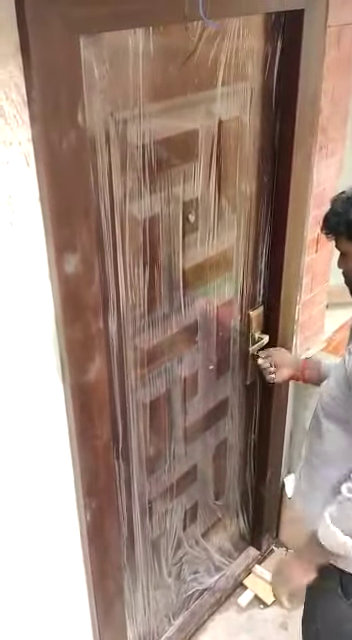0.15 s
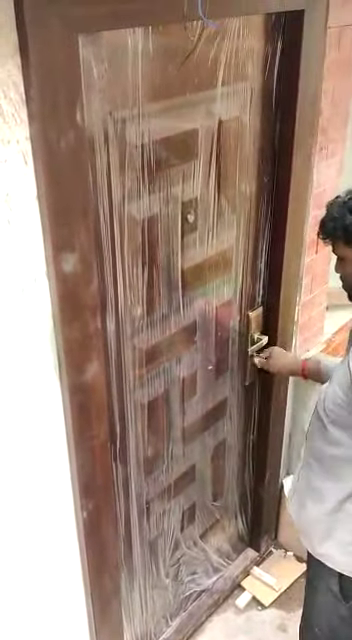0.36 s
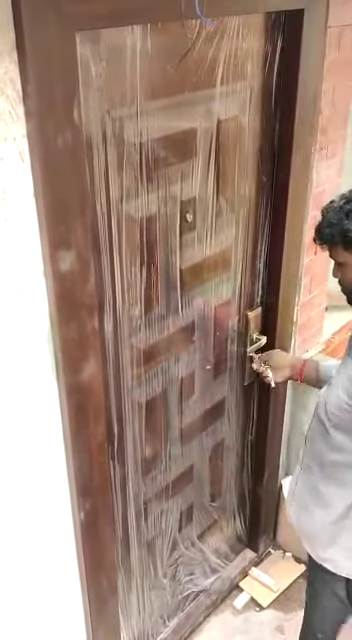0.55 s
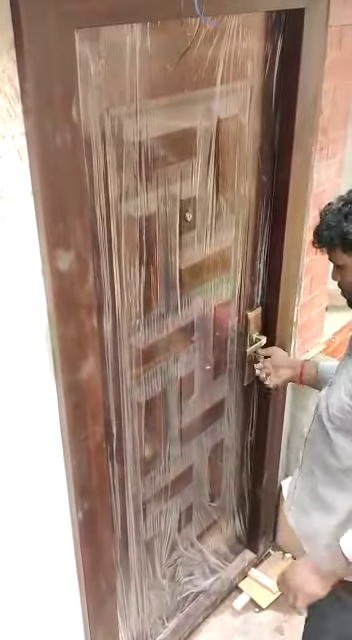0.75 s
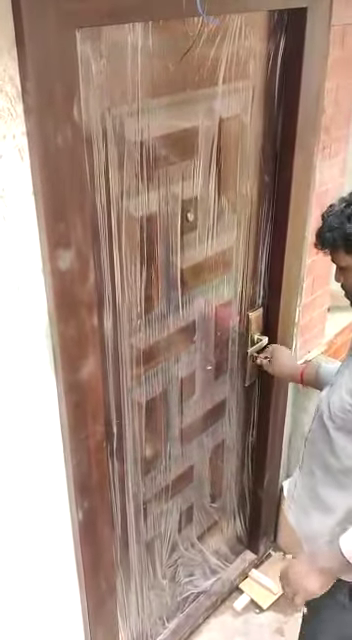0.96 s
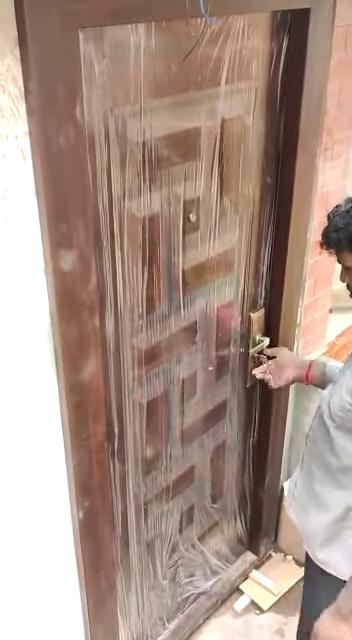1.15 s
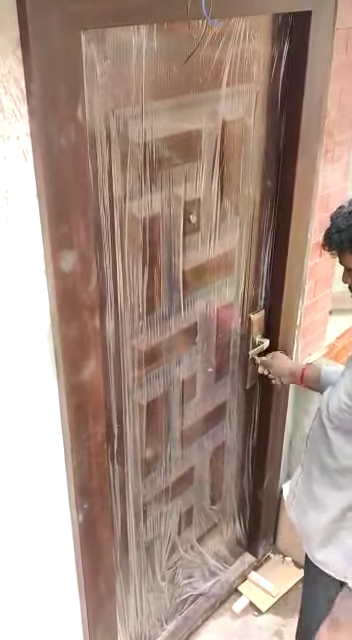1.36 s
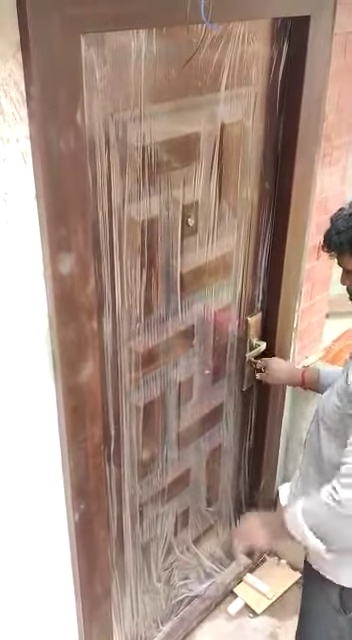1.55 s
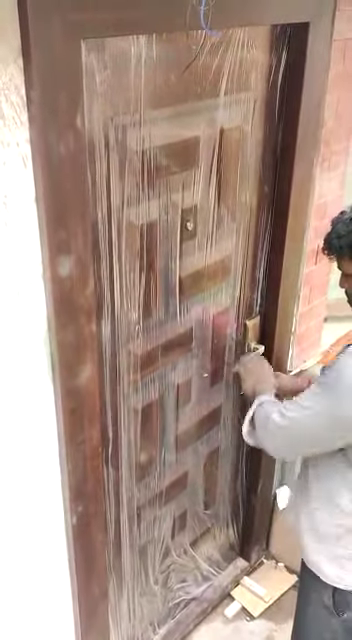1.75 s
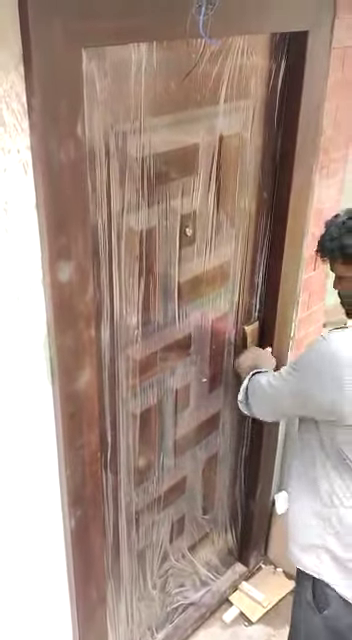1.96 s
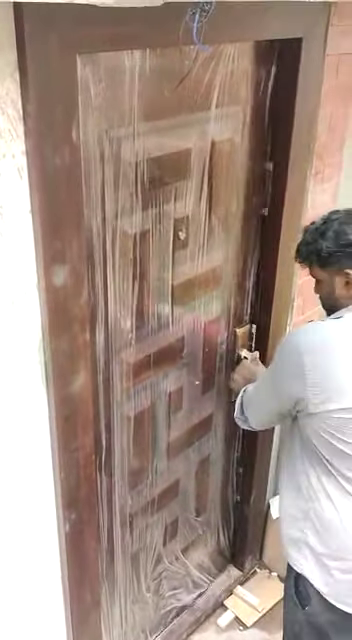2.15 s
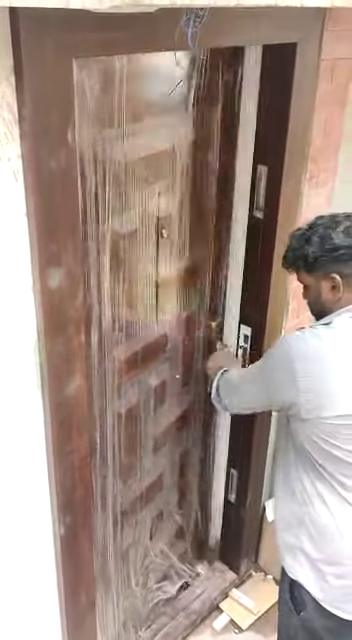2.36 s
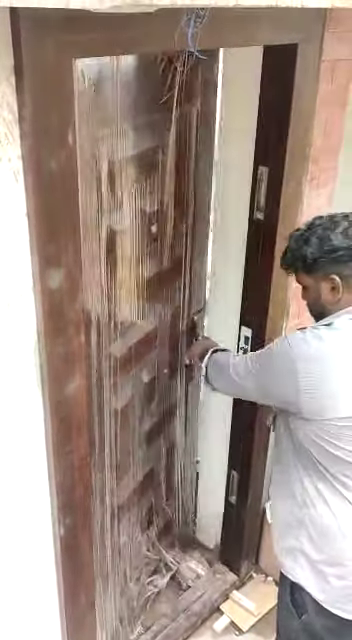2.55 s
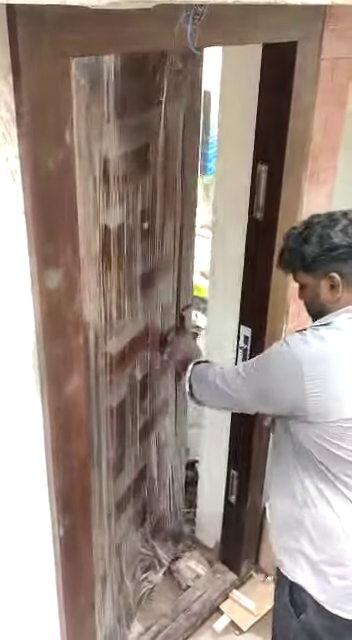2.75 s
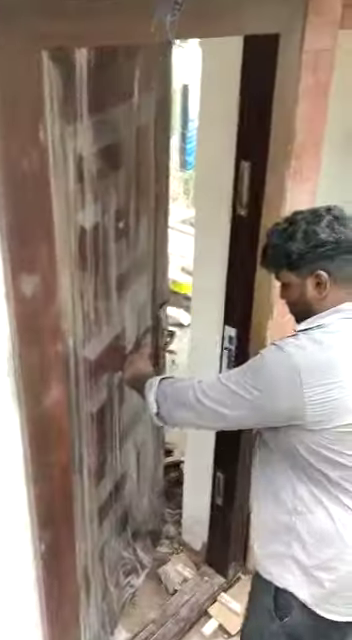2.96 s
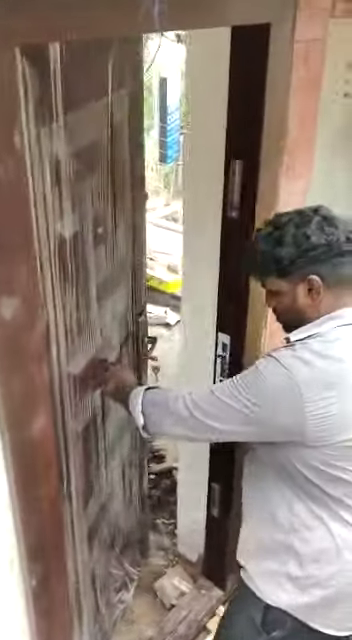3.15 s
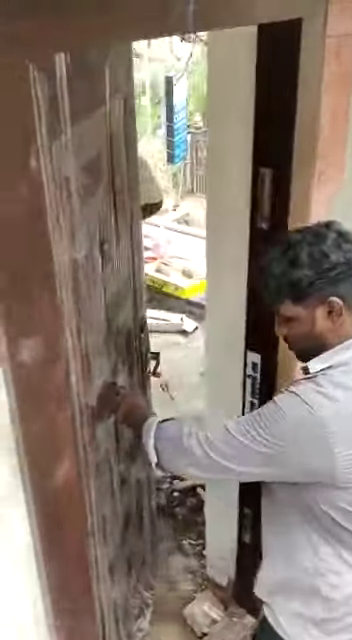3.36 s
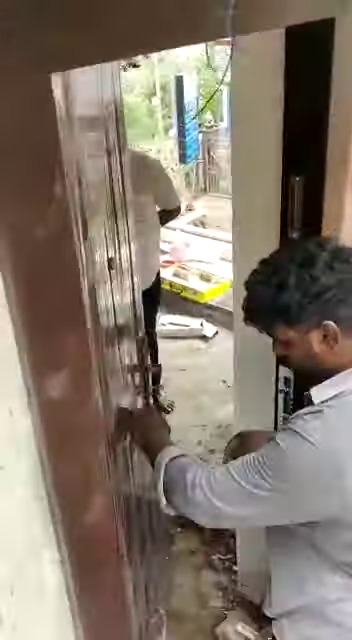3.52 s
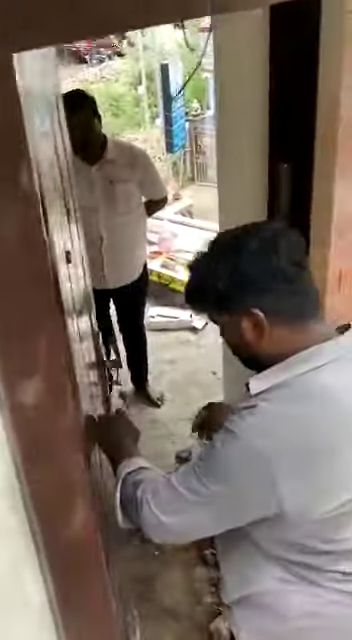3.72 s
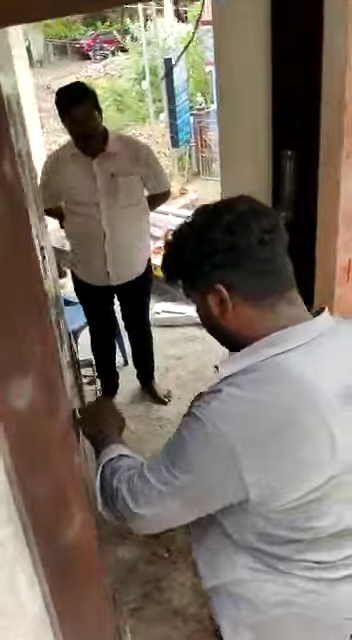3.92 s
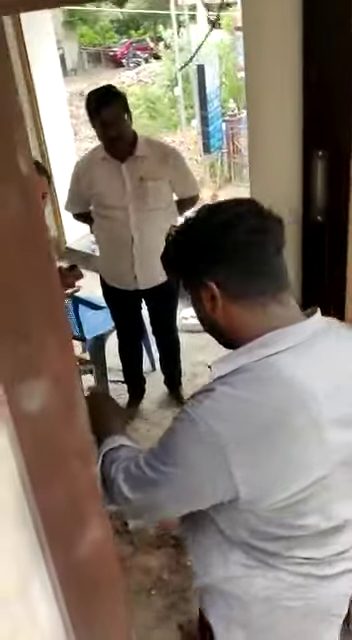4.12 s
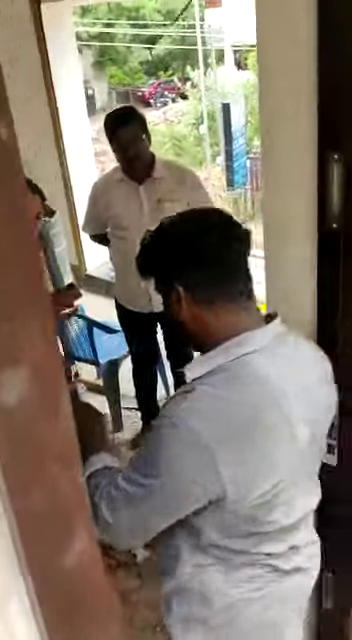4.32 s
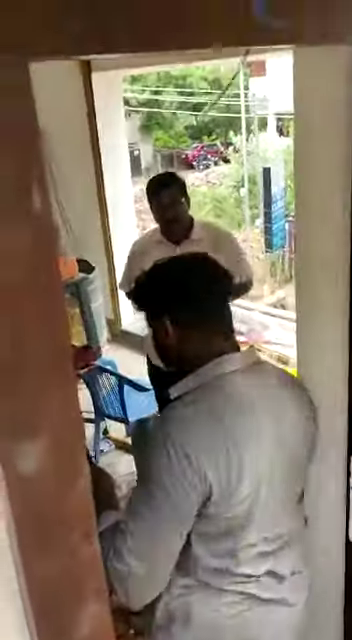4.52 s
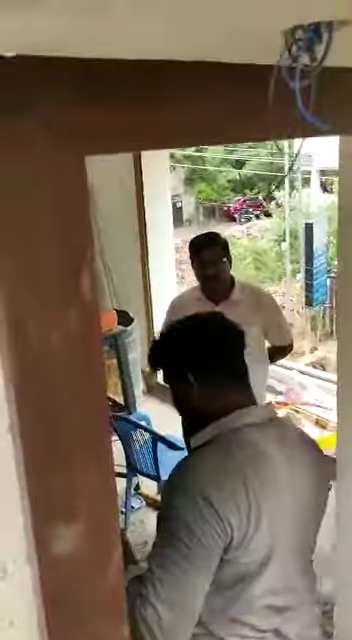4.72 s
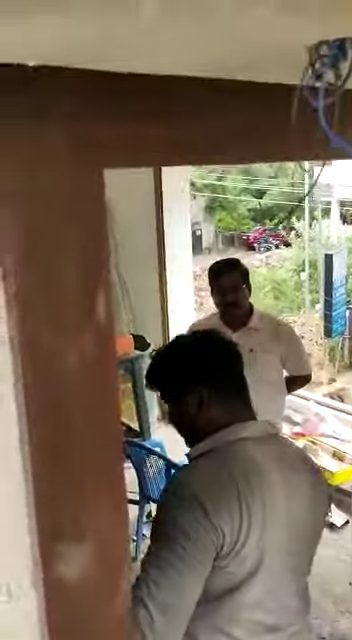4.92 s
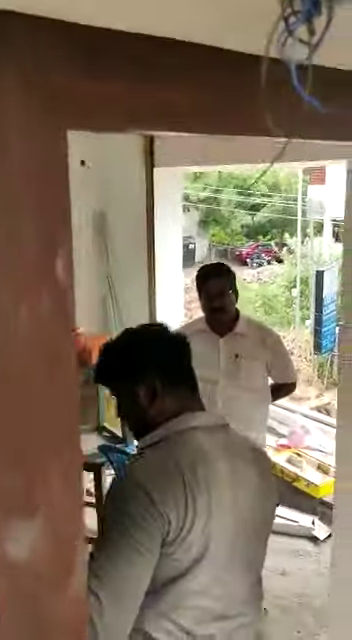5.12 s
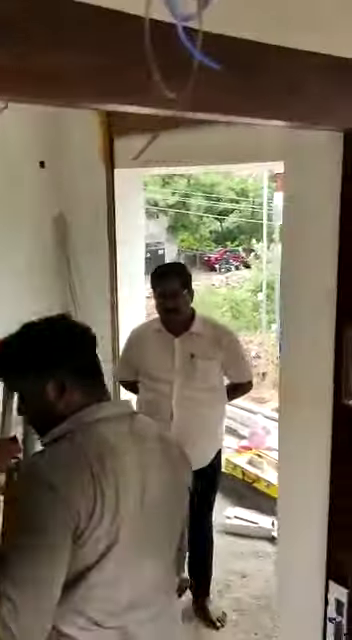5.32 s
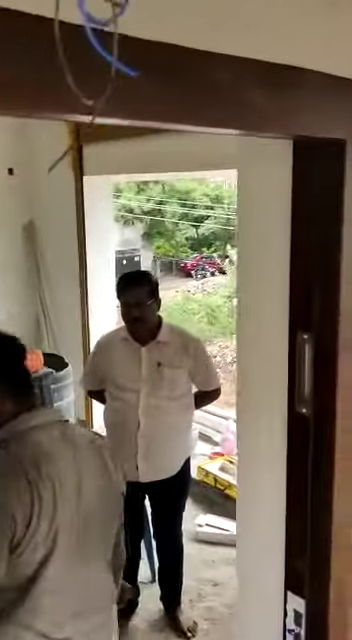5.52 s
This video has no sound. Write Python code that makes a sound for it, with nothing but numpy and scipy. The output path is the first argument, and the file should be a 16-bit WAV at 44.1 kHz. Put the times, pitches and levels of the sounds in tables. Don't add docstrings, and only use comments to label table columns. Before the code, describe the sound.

Handheld stereo pickup at a doorway on a building site: quiet rumble and hiss, small metallic ticks, two strong lock throws about a second apart, then a bright latch rattle as the door comes free. The rest is loud abrasive cutting, surging several times a second or so, with singing blade tones, rumbling work and a motor hum swelling at the end.

```python
import sys
import numpy as np
from scipy import signal
from scipy.fft import rfft, irfft, next_fast_len
from scipy.io import wavfile

SR = 44100
rng = np.random.default_rng(int(sys.argv[2]) if len(sys.argv) > 2 else 0)


def wav_out(sig):
    wavfile.write(sys.argv[1], SR, np.round(np.clip(np.atleast_2d(sig).T, -1, 1) * 32767).astype(np.int16))


def boost_factor(decibels):
    exponent = np.asarray(decibels, float) / 20
    return 10 ** exponent


N = 246078

# (time [s], peak level [dB], door body level [dB], T60 [s])
CONTACTS = [(0.065, -63, -58, 0.16), (0.124, -50, -39, 0.15), (0.153, -41, -36, 0.11),
            (0.2145, -32.5, -27.5, 0.17), (0.237, -30, -37, 0.12), (0.259, -19.5, -23, 0.16),
            (0.2893, -16, -44, 0.11), (0.6305, -33, -28, 0.13), (0.6415, -31, -28, 0.13),
            (0.6691, -48, -31.5, 0.12), (0.8779, -40, -34.5, 0.086), (0.913, -32, -46, 0.16),
            (0.9396, -39.5, -29.5, 0.25), (0.9791, -44, -29.5, 0.11), (1.034, -46, -38, 0.14),
            (1.079, -39.5, -48, 0.2), (1.272, -31.5, -31, 0.086), (1.3364, -37, -32, 0.22),
            (1.3812, -24.5, -22.5, 0.16), (1.4057, -16, -16.5, 0.14), (1.4347, -9, -26, 0.11),
            (1.7025, -46, -38, 0.08), (1.736, -43, -43, 0.4), (1.8399, -44, -35, 0.28),
            (1.9655, -42, -29, 0.092), (2.0707, -35.5, -27, 0.31), (2.1072, -13.5, -31, 0.14),
            (2.1386, -16, -33, 0.1), (2.176, -15.5, -45, 0.07), (2.2872, -12.5, -33, 0.067)]
# (time at full speed [s], run-up [s], hold [s], scrape level [dB], body level [dB])
SLIDES = [
    (0.295, 0.025, 0.033, -24, -18.5),
    (1.441, 0.044, 0.025, -25, -21.5),
    (2.115, 0.0044, 0.014, -33, -33),
    (2.17, .004, .004, -35, -30),
    (2.284, 0.045, .002, -34.5, -32.5),
]
# (time [s], peak level [dB], frequency [Hz], T60 [s])
PINGS = [
    (0.0643, -45, 4340, 0.073),
    (0.154, -43, 4430, 0.074),
    (0.6205, -42, 4480, 0.08),
    (0.639, -43, 4600, 0.06),
    (0.799, -51, 4380, 0.074),
    (1.0799, -45, 5980, 0.08),
    (1.272, -44, 4370, 0.08),
    (2.107, -34, 2490, 0.12),
]
# (frequency [Hz], width [Hz], level [dB])
LOCK_MODES = [(1140, 33, 19), (1430, 7, 13.5), (1820, 41, 10), (2490, 190, -5), (2900, 36, -34.5),
              (3280, 73, -10.5), (3840, 77, -42), (4740, 68, 20), (5720, 240, -2), (6700, 44, 7),
              (8300, 220, -28), (8770, 34, -78)]
# (frequency [Hz], density [dB per Hz])
LOCK_SPECTRUM = [(700, -6.5), (1300, -1.5), (3200, -4.5), (4800, -6), (6800, -9.5), (8500, -23),
                 (11000, -9), (14500, -20.5), (18000, -18)]
# (frequency [Hz], width [Hz], level [dB])
DOOR_MODES = [(198, 87, -7.5), (311, 230, -1.5), (343.6, 19, -3), (406, 87, 4), (450, 51, -9),
              (565.4, 25, -2), (764, 84, -18)]
LATCH_FROM_S, LATCH_CUT_HZ = 2.06, 2200
SCRAPE_FALL_DB_PER_S, BOOM_FALL_DB_PER_S = 456, 184
SETTLE_DB, SETTLE_DB_PER_S = -20.5, 95

# (time [s], hold [s], level [dB])
SHUDDERS = [
    (.30, .03, -30.5),
    (1.446, .03, -33),
    (1.987, .015, -33),
    (2.103, .11, -23.5),
    (2.66, .01, -38),
]
SHUDDER_HZ, SHUDDER_RISE_S, SHUDDER_FALL_DB_PER_S = 30.5, 0.03, 65

# (time at full pressure [s], hold [s], grit level [dB], work rumble level [dB])
PUSHES = [(2.393, 0.16, -26, -23), (2.85, 0.08, -22, -23), (3.177, .02, -22, -23.5),
          (3.402, 0.072, -23, -21), (3.748, 0.047, -21.5, -20), (4.007, 0.027, -22, -19),
          (4.244, .02, -22.5, -20), (4.425, 0.11, -23, -19.5), (4.687, 0.1, -26, -24.5),
          (4.907, 0.037, -25, -20.5), (5.09, 0.16, -24.5, -25.5), (5.343, 0.33, -23, -31)]
PUSH_RISE_S, GRIT_FALL_DB_PER_S, RUMBLE_FALL_DB_PER_S = 0.19, 65, 61
CUT_FROM_S, IDLE_GRIT_DB, IDLE_RUMBLE_DB = 2.29, -30.5, -38
# (time [s], hold [s], low song level [dB], high song level [dB])
SONGS = [(2.377, 0.22, -29, -29), (2.524, 0.13, -32, -30), (2.845, 0.2, -31.5, -30),
         (3.18, 0.023, -21, -23.5), (3.274, 0.1, -25, -30.5), (3.39, .03, -29, -35),
         (3.464, 0.11, -43, -30), (3.767, 0.13, -33, -28), (4.053, 0.033, -23.5, -28),
         (4.258, 0.13, -32, -29), (4.44, 0.24, -27.5, -27.5), (4.74, 0.29, -29, -30),
         (5.1, 0.15, -35, -36.5), (5.42, .12, -48, -34)]
SONG_RISE_S, SONG_FALL_DB_PER_S = 0.079, 132
# (frequency [Hz], density [dB per Hz])
GRIT_SPECTRUM = [(600, -5), (850, -25), (1100, -27), (1400, -8), (2300, -3.5), (3050, -8), (4300, -0.5),
                 (5600, -7.5), (7200, -10), (9900, -15), (12000, -16), (14000, -12), (18000, -40)]
# (frequency [Hz], density [dB per Hz])
RUMBLE_SPECTRUM = [(53, -40), (90, -9.5), (226, -2.5), (284, 1.5), (330, -1.5), (419, -4), (504, -3),
                   (587, -0.5), (668, -2.5), (1200, -5.5), (1560, -60), (2640, -120)]
# (frequency [Hz], width [Hz], level [dB])
WORK_MODES = [(337, 30, 0), (427, 29, 2.5), (583, 30, -4.5), (723, 29, -10.5)]
WORK_DB = -3
# (frequency [Hz], width [Hz], level [dB])
LOW_SONG_MODES = [(4228, 90, 0), (4350, 600, -5)]
# (frequency [Hz], width [Hz], level [dB])
HIGH_SONG_MODES = [(11615, 150, 0), (12310, 60, -4), (12200, 1500, -3), (7410, 150, -5), (6930, 140, -7)]
# (frequency [Hz], width [Hz], level [dB])
SQUEAL_MODES = [(4800, 250, 0)]
SQUEAL_S, SQUEAL_HOLD_S, SQUEAL_DB = 4.7, 0.1, -28
TOOL_LAG = 10

# (time [s], shaft frequency [Hz], nearness as level of its tones [dB])
MOTOR = [
    (2.3, 53.94, -46),
    (3.2, 53.96, -38),
    (4.2, 54.13, -36),
    (4.651, 53.7, -37.5),
    (4.9, 53.37, -31.5),
    (5.3, 53.34, -27),
    (5.58, 53.6, -25.5),
]
ORDERS = [2, 3, 4, 6, 7, 8, 9, 10, 11, 12, 14, 17, 20, 21, 22, 26, 37]
ORDERS_DB = [-30, -1.5, -6, -0.5, -4.5, -5.5, -9.5, -6, 3, -7, -10, -18, -2, -10, -13, -15, -9]
# (frequency [Hz], density [dB per Hz])
FAN_SPECTRUM = [(750, -2.5), (1070, -7), (1300, -5), (1900, -7.5), (2300, -11.5), (2800, -25)]
LOWEST_DB, FAN_DB, FAN_FOLLOWS = -40, -25.5, 1
FAN_FLICKER_DB = 1.5
# (time [s], hold [s], level [dB])
BOOMS = [
    (4.502, .1, -44),
    (5.365, .3, -24.5),
]
BOOM_RISE_S, BOOM_END_DB_PER_S = 0.1, 82

ROOM_T60_S, WALL_CUT_HZ = 0.42, 9300

# (frequency [Hz], density [dB per Hz])
TRAFFIC_SPECTRUM = [(12, -30), (20, -5.5), (70, -5.5), (103, -11), (140, -14.5), (171, -22), (194, -47.5),
                    (250, -15), (320, -72), (550, -120)]
# (frequency [Hz], density [dB per Hz])
HISS_SPECTRUM = [(150, -2.5), (250, -5), (400, -7.5), (700, -17), (1000, -20), (1500, -22.5), (2500, -27),
                 (4400, -26), (6300, -30), (7600, -49), (11000, -30), (14000, -51), (18000, -28)]
TRAFFIC_DB, HISS_DB = -37.5, -47

# (frequency [Hz], correlation [1])
LIKENESS = [(60, 0.95), (180, 1), (550, 0.8), (1650, -0.068), (4970, -0.003), (15000, -0.11)]
# (frequency [Hz], level difference [dB])
TILT = [(60, 0.5), (240, -1.5), (950, -0.5), (3770, -1.0), (15000, 2.5)]
TOP_HZ = 15750


def lock():
    bright_power, body_power, struck = np.zeros(N), np.zeros(N), np.zeros(N)
    door_hz, door_width, door_db = np.transpose(DOOR_MODES)[:, :, None]
    strength_db = rng.normal(0, 1.5, (len(CONTACTS), len(DOOR_MODES), 1))
    t = np.arange(SR // 2) / SR
    for (s, db, body_db, t60), own_db in zip(CONTACTS, strength_db):
        at = slice(round(s * SR), round(s * SR) + len(t))
        bright_power[at] += boost_factor(db - 9.5 - 60 * t / max(t60, 0.01)) ** 2
        body_power[at] += (boost_factor(body_db - 6.5 - 60 * t / 0.2) * (1 - np.exp(-t / 0.004))) ** 2
        decay = np.exp(-np.pi * 0.45 * door_width * t)
        knock = boost_factor(door_db + own_db) * decay * np.sin(2 * np.pi * door_hz * t)
        struck[at] += boost_factor(body_db - 6.0) * knock.sum(0) * (1 - np.exp(-t / 0.0052))
    for s, db, hz, t60 in PINGS:
        ping = boost_factor(db - 4.0 - 60 * t / max(t60, 0.01)) * np.sin(2 * np.pi * hz * t)
        struck[round(s * SR):][:len(t)] += ping

    s, rise, hold, scrape_db, boom_db = np.transpose(SLIDES)
    before_latch = np.arange(N) < LATCH_FROM_S * SR
    settling = bouts(s, hold, scrape_db + SETTLE_DB, rise, SETTLE_DB_PER_S)
    bright_power += bouts(s, hold, scrape_db, rise, SCRAPE_FALL_DB_PER_S) ** 2
    bright_power += before_latch * settling ** 2
    body_power += bouts(s, hold, boom_db, rise, BOOM_FALL_DB_PER_S) ** 2

    rattle = grains(14000, 1.5)
    case = colour(rattle, LOCK_SPECTRUM, patchy_db=1.8, rate=25)
    case = case + boost_factor(-10) * resonate(rattle, LOCK_MODES, waver_db=1.5, rate=12)
    thin = signal.sosfilt(signal.butter(2, LATCH_CUT_HZ, "high", fs=SR, output="sos"), case)
    case = np.where(before_latch, case, thin)
    leaf = resonate(grains(2500, 2.0), DOOR_MODES, waver_db=1.5, rate=11)
    struck_pair = struck * boost_factor(np.array([[-0.6], [0.6]]))
    return np.sqrt(bright_power) * case + np.sqrt(body_power) * leaf + struck_pair


def shudder():
    phase = 2 * np.pi * np.cumsum(SHUDDER_HZ * (1 + 0.058 * drift(4.1))) / SR
    flexing = np.sin(phase) + 0.14 * np.sin(2 * phase + 1.4)
    return bouts(*np.transpose(SHUDDERS), SHUDDER_RISE_S, SHUDDER_FALL_DB_PER_S) * 1.4 * flexing


def tool():
    s, hold, grit_db, rumble_db = np.transpose(PUSHES)
    touching = np.clip((np.arange(N) / SR - CUT_FROM_S) / 0.0029, 0, 1)
    grit_push = bouts(s, hold, grit_db, PUSH_RISE_S, GRIT_FALL_DB_PER_S)
    rumble_push = bouts(s, hold, rumble_db, PUSH_RISE_S, RUMBLE_FALL_DB_PER_S)
    grit = touching * np.hypot(boost_factor(IDLE_GRIT_DB), grit_push)
    rumble = touching * np.hypot(boost_factor(IDLE_RUMBLE_DB), rumble_push)
    s, hold, low_db, high_db = np.transpose(SONGS)
    low_song = bouts(s, hold, low_db, SONG_RISE_S, SONG_FALL_DB_PER_S)
    high_song = bouts(s, hold, high_db, SONG_RISE_S, SONG_FALL_DB_PER_S)
    squeal = bouts(SQUEAL_S, SQUEAL_HOLD_S, SQUEAL_DB, SONG_RISE_S, SONG_FALL_DB_PER_S)

    bite = grains(16000, 2.1) * boost_factor(0.8 * drift(60))
    blade_bite = bite[:, ::-1]
    out = grit * boost_factor(3.0) * colour(bite, GRIT_SPECTRUM, patchy_db=0.83, rate=22)
    out += rumble * boost_factor(-2.4) * colour(grains(6000, 0.93), RUMBLE_SPECTRUM, patchy_db=0.5, rate=7.8)
    out += rumble * boost_factor(WORK_DB) * resonate(grains(5000, 0.99), WORK_MODES, waver_db=2.0, rate=4.7)
    out += squeal * resonate(bite[::-1], SQUEAL_MODES, waver_db=1.5, rate=9, order=2)
    out += low_song * resonate(blade_bite, LOW_SONG_MODES, waver_db=2.5, rate=9, order=2)
    out += high_song * boost_factor(3) * resonate(blade_bite, HIGH_SONG_MODES, waver_db=2, rate=9, order=2)
    return np.array([touching * np.roll(out[0], TOOL_LAG), out[1]])


def motor():
    s, shaft_hz, near_db = np.transpose(MOTOR)
    speed = np.interp(np.arange(N) / SR, s, shaft_hz) * (1 + 0.0031 * drift(4.5))
    phase = 2 * np.pi * np.cumsum(speed) / SR
    fan_db = FAN_DB + FAN_FOLLOWS * (near_db + 30)
    rows = np.transpose([s, LOWEST_DB + 0 * s, near_db, fan_db])
    lowest, upper, fan = in_time(rows, fade=0.042)
    even = bouts(*np.transpose(BOOMS), BOOM_RISE_S, BOOM_END_DB_PER_S)
    out = lowest * boost_factor(5.0 + 2.0 * drift(8.8)) * np.sin(phase)
    whoosh = colour(rng.standard_normal((2, N)), FAN_SPECTRUM, patchy_db=FAN_FLICKER_DB, rate=12.0)
    out = out + fan * whoosh
    for k, db in zip(ORDERS, ORDERS_DB):
        start = rng.uniform(0, 2 * np.pi) + 0.046 * k * np.array([[-1], [1]])
        gain = even if k in (4, 6) else upper
        out += gain * boost_factor(db + (1.5 + 0.06 * k) * drift(8)) * np.sin(k * phase + start)
    return out


def room(x):
    size = next_fast_len(N + SR)
    w = 2 * np.pi * np.arange(size // 2 + 1) / size
    dull = 1 / (1 + 1j * w * SR / (2 * np.pi * WALL_CUT_HZ))
    tail = np.zeros((2, len(w)), complex)
    lags = (rng.uniform(0.0093, 0.036, 16) * SR).astype(int)
    for k, lag in enumerate(lags):
        loop = boost_factor(-60 * lag / SR / ROOM_T60_S) * dull * np.exp(-1j * w * lag)
        tail[k % 2] += (-1) ** (k // 2) * loop / (1 - loop)
    return irfft(rfft(x.mean(0), size) * tail, size)[:, :N]


def air():
    noise = rng.standard_normal((2, N))
    out = boost_factor(TRAFFIC_DB + 3.0) * colour(noise, TRAFFIC_SPECTRUM, patchy_db=1.0, rate=23)
    return out + boost_factor(HISS_DB + 2.0) * colour(noise[::-1], HISS_SPECTRUM, patchy_db=2.0, rate=28)


def grains(per_s, spread_db):
    sizes = boost_factor(spread_db * np.minimum(rng.exponential(1, (2, N)), 5))
    sizes = sizes * rng.choice([-1, 1], (2, N))
    contacts = rng.random((2, N)) < per_s / SR
    return rms_one(sizes * contacts + 1e-9)


def bouts(start, hold, db, rise, fall_db_per_s):
    t = np.arange(0, N + 32, 32) / SR
    start, hold, db, rise = (np.reshape(v, (-1, 1)) for v in (start, hold, db, rise))
    rise_loss_db = 20 * np.maximum(start - t, 0) / np.maximum(rise, 1e-3)
    fall_loss_db = fall_db_per_s * np.maximum(t - start - hold, 0)
    gain = np.sqrt(np.sum(boost_factor(db - (rise_loss_db + fall_loss_db)) ** 2, axis=0))
    return np.interp(np.arange(N) / SR, t, gain)


def resonate(pair, modes, waver_db, rate, order=1):
    out = 0
    for k, (hz, width, db) in enumerate(modes):
        r = np.exp(-np.pi * max(width, 2) / SR)
        sos = [[0.93, 0.0024, -1.035, 1, -2 * r * np.cos(2 * np.pi * hz / SR), r * r]] * order
        shifted = np.roll(pair, k * N // len(modes), axis=1)
        ringing = rms_one(signal.sosfilt(sos, shifted))
        out = out + (-1) ** k * boost_factor(db + waver_db * drift(rate)) * spread(ringing, hz)
    return rms_one(out)


def colour(pair, spectrum, patchy_db, rate):
    out = 0
    bottom, top = spectrum[0][0], spectrum[-1][0]
    edges = np.geomspace(bottom, top, round(3 * np.log2(top / bottom)))
    for k, (low, high) in enumerate(zip(edges, edges[1:])):
        sos = signal.butter(2, [low, high], "band", fs=SR, output="sos")
        band = signal.sosfilt(sos, np.roll(pair, N // 2 * (k % 2), 1))
        hz = np.sqrt(low * high)
        out = out + boost_factor(at_hz(spectrum, hz) + patchy_db * drift(rate)) * spread(band, hz)
    return rms_one(out)


def spread(pair, hz):
    alike = np.clip(at_hz(LIKENESS, hz), -1, 1)
    tilt = at_hz(TILT, hz) / 2
    mid = np.sqrt(1 + alike) * pair[0]
    side = np.sqrt(1 - alike) * pair[1] * [[1], [-1]]
    return (mid + side) * boost_factor(np.array([[tilt], [-tilt]]))


def drift(rate):
    r = np.exp(-80 * np.pi * rate / SR)
    slow = signal.lfilter([1], [1, -2 * r, r * r], rng.standard_normal(N // 40 + 2002))[2000:]
    return np.interp(np.arange(N) / 40, np.arange(len(slow)), rms_one(slow))


def in_time(rows, fade):
    s, *columns = np.transpose(rows)
    t = np.arange(N) / SR
    on = np.clip((t - s[0]) / fade, 0, 1) * np.clip((s[-1] + 0.033 - t) / 0.027, 0, 1)
    return [on * boost_factor(np.interp(t, s, c)) for c in columns]


def at_hz(points, hz):
    point_hz, value = np.transpose(points)
    return np.interp(np.log(hz), np.log(point_hz), value)


def rms_one(x):
    return x / np.sqrt(np.mean(x ** 2) + 1e-20)


def scene():
    door = lock()
    return door + boost_factor(-17.5) * room(door) + shudder() + tool() + motor() + air()


def top_cut(x):
    return signal.sosfilt(signal.butter(12, 16510, fs=SR, output="sos"), x)


def record(dry):
    soft = 0.9 * np.tanh(dry / 0.9)
    mix = signal.sosfilt(signal.ellip(12, 0.5, 70, TOP_HZ, fs=SR, output="sos"), soft)
    return top_cut(mix)


dry = scene()
out = record(dry)
wav_out(out)
```